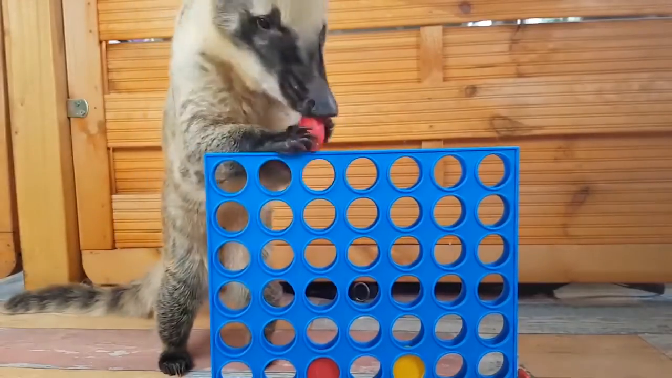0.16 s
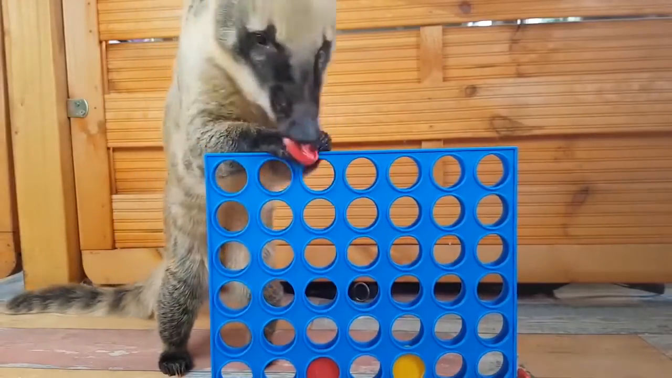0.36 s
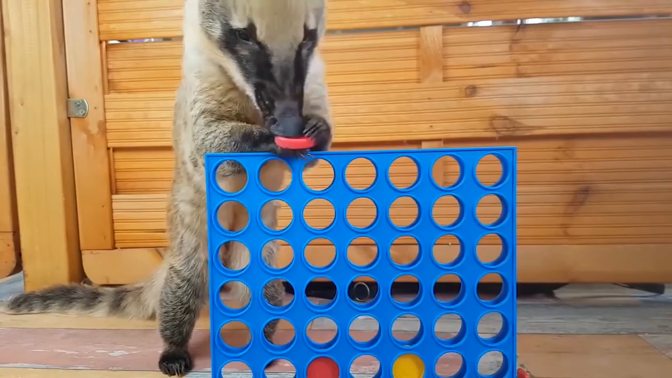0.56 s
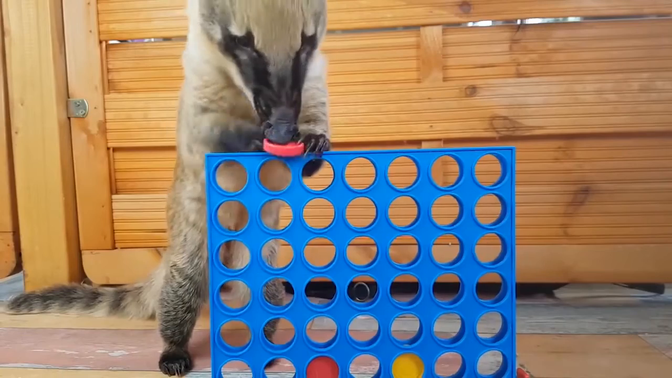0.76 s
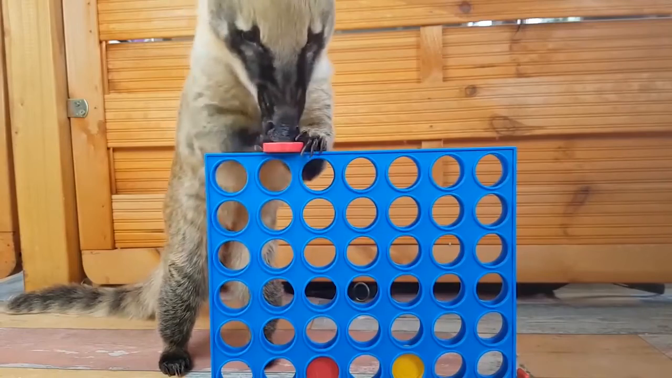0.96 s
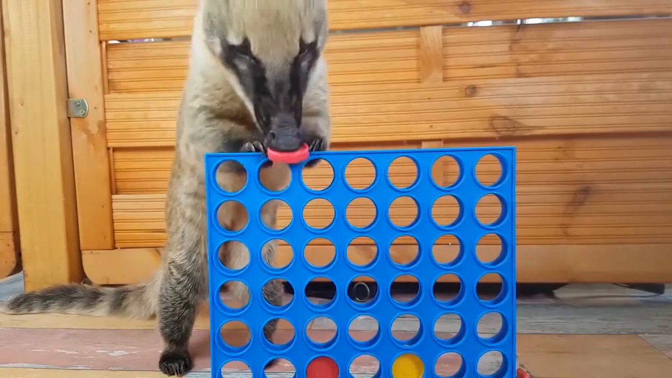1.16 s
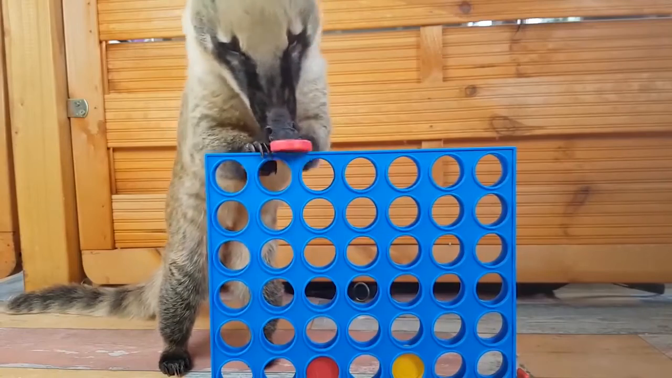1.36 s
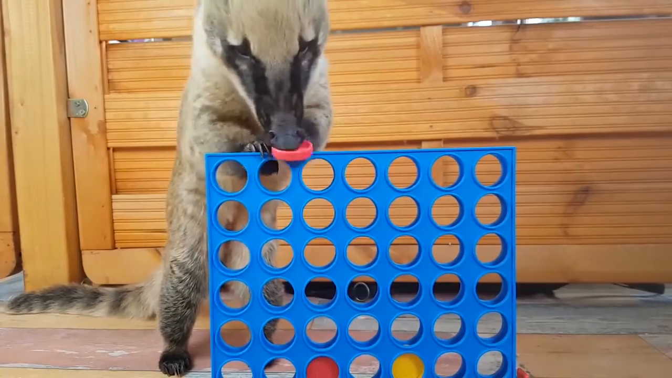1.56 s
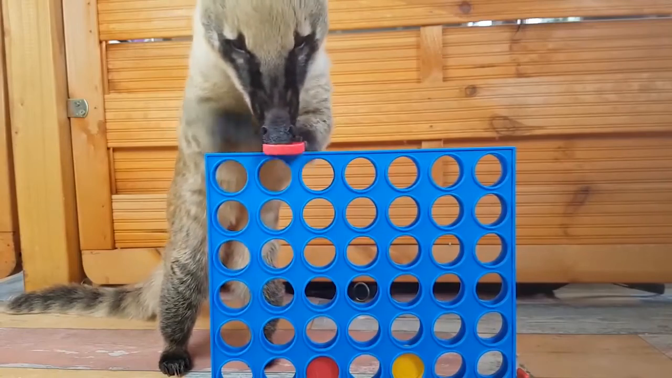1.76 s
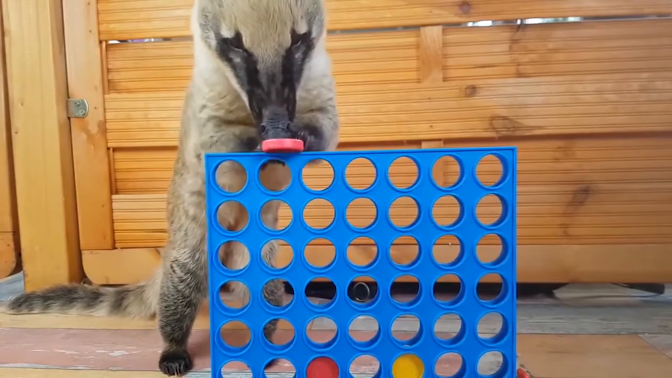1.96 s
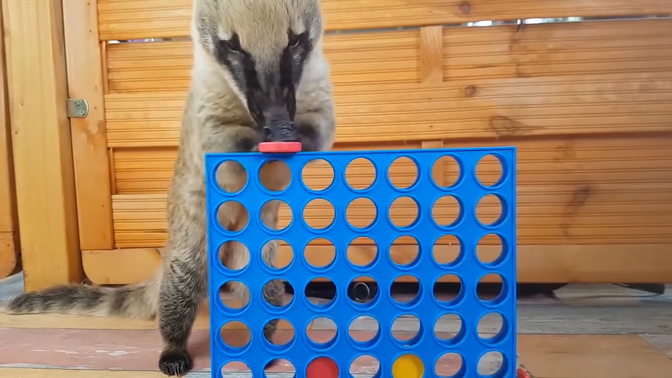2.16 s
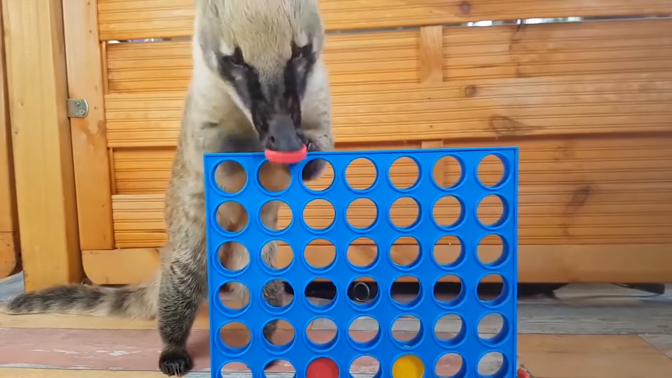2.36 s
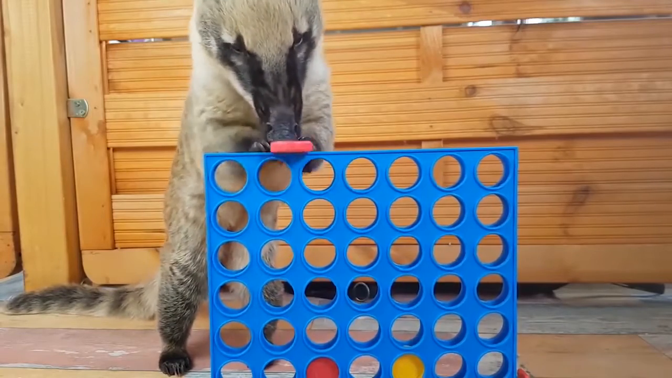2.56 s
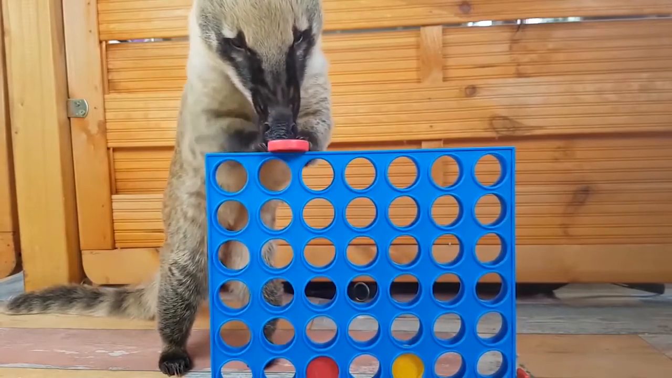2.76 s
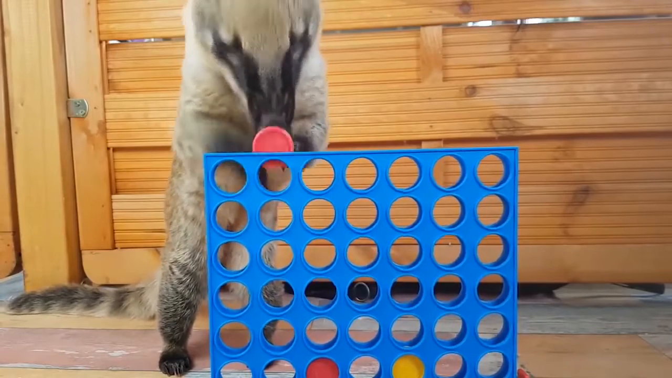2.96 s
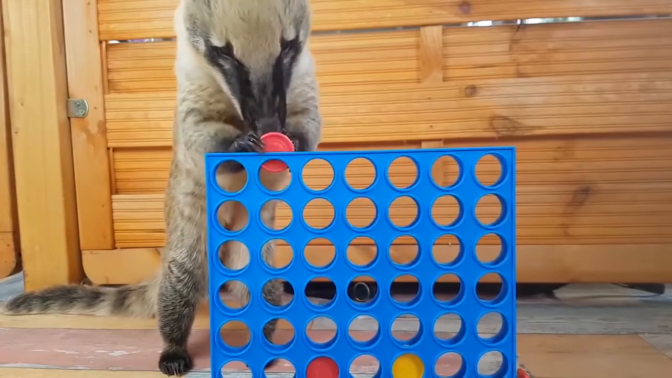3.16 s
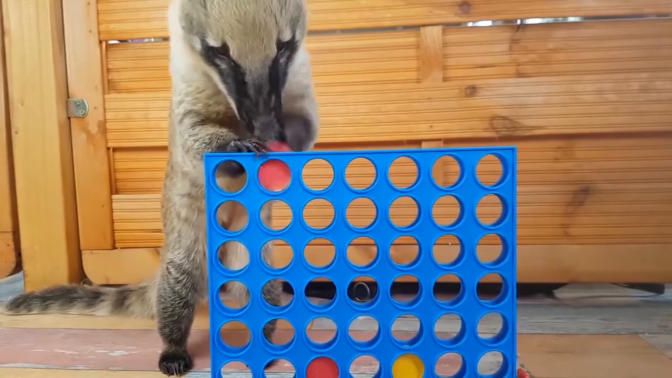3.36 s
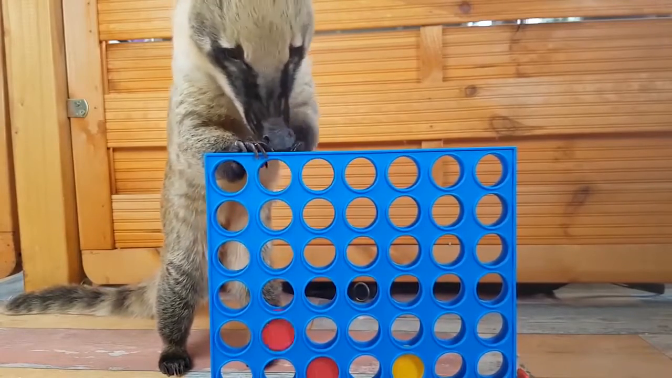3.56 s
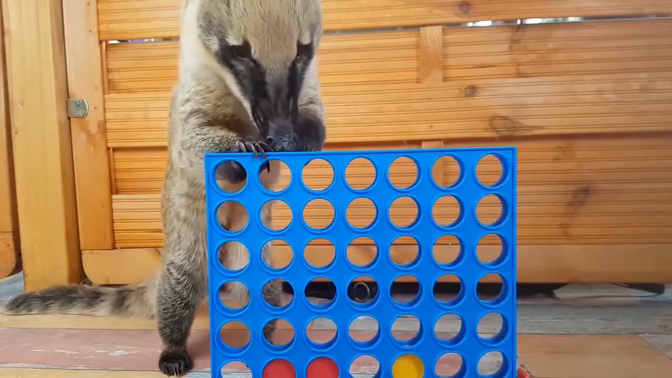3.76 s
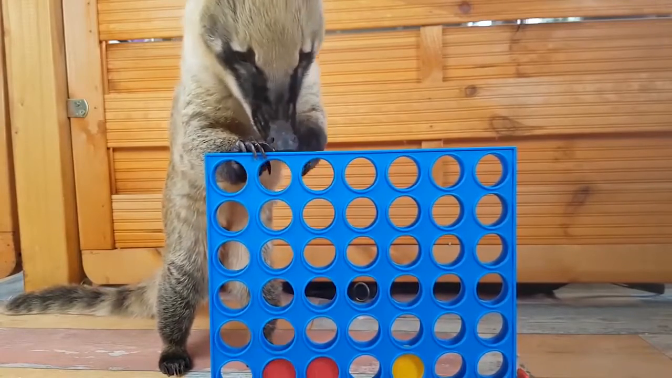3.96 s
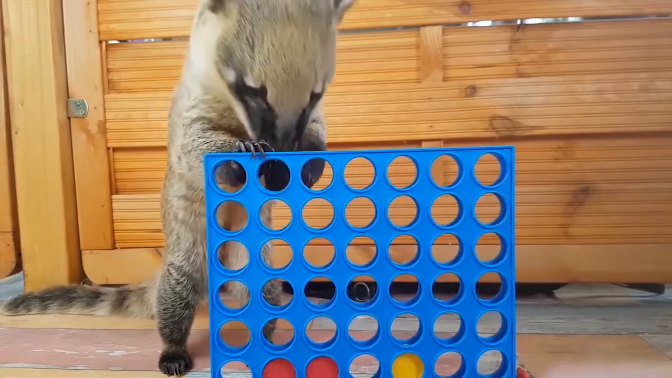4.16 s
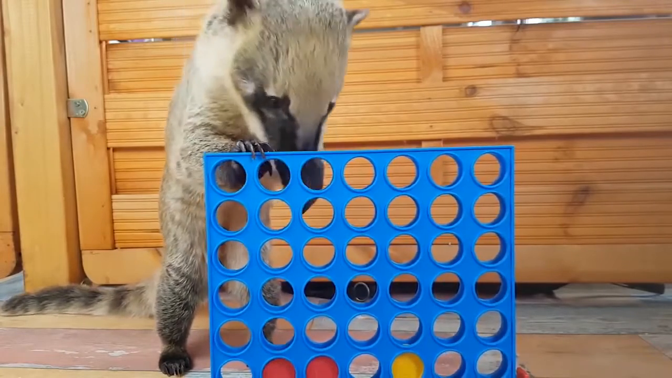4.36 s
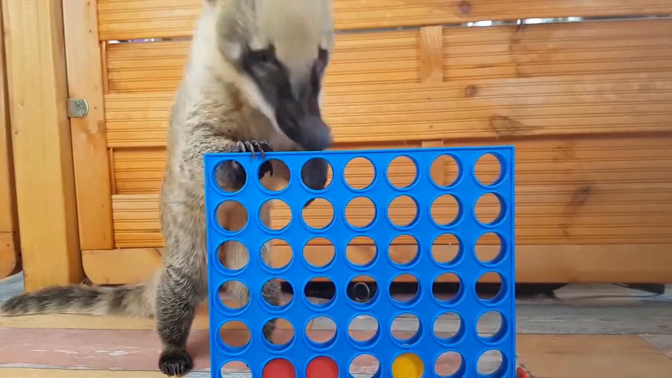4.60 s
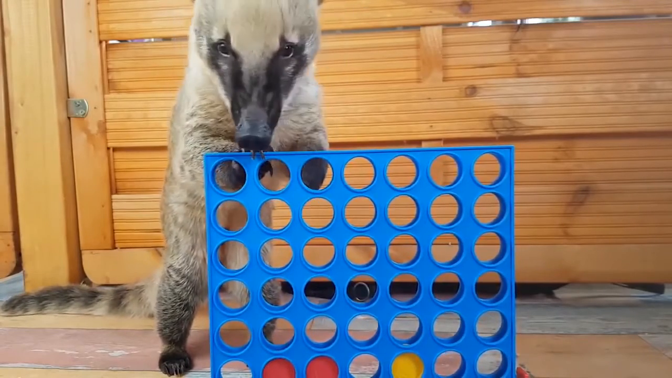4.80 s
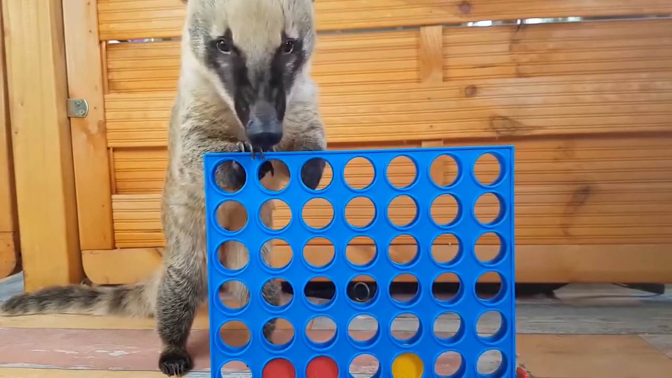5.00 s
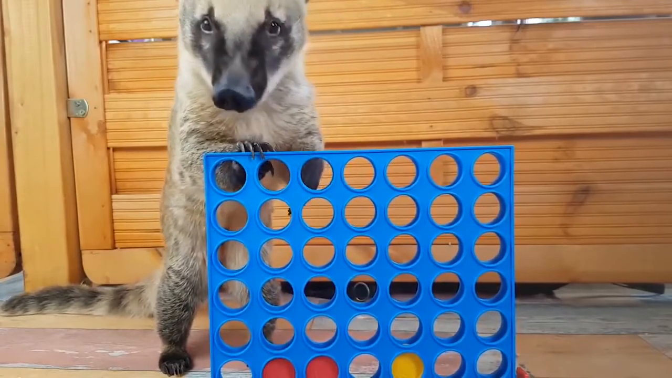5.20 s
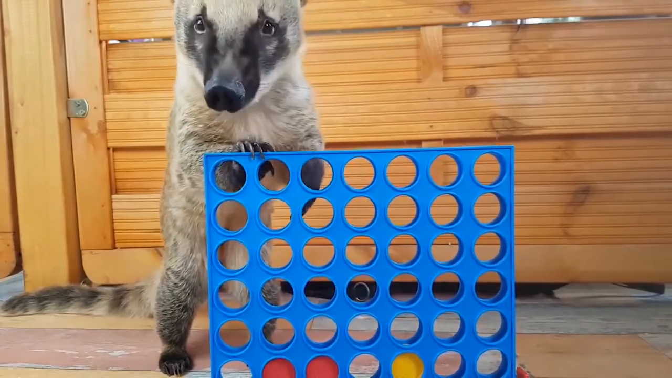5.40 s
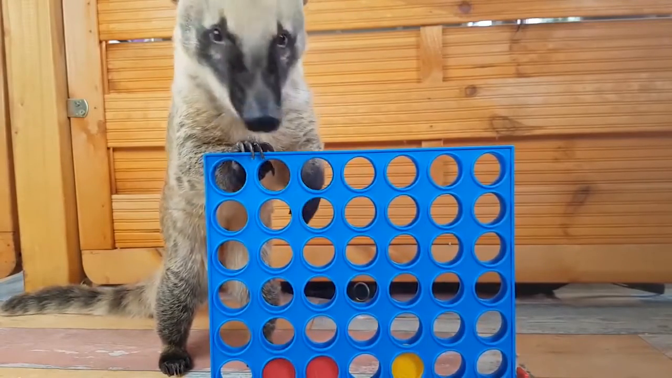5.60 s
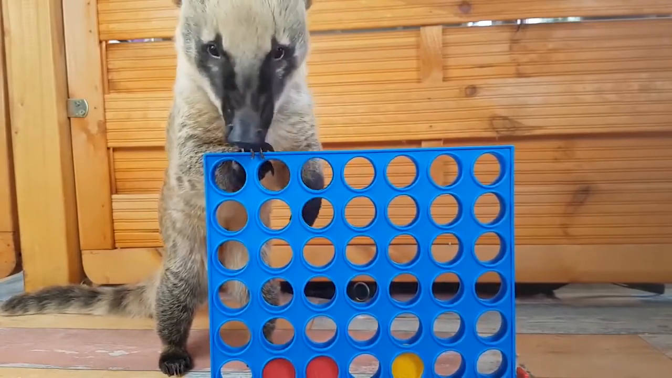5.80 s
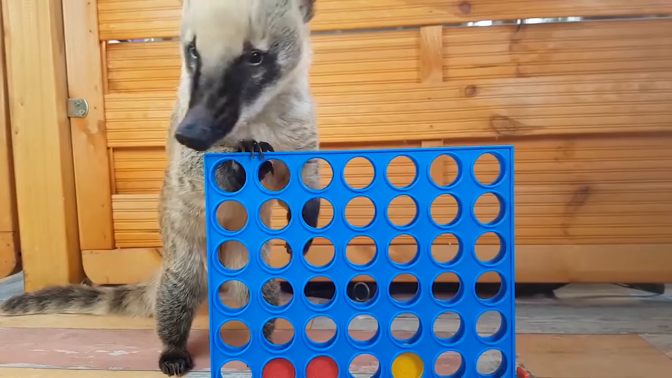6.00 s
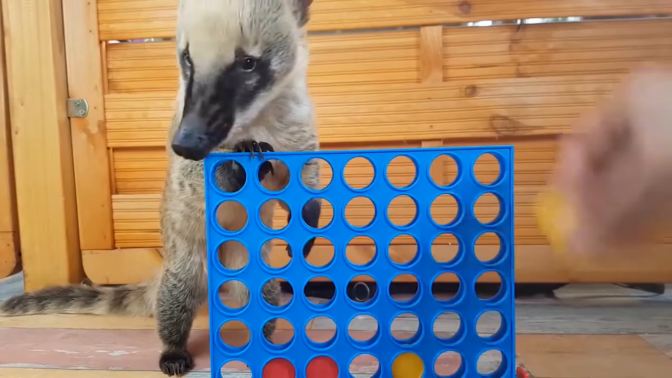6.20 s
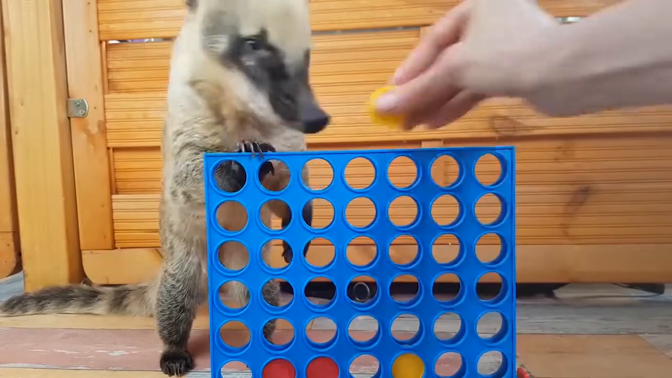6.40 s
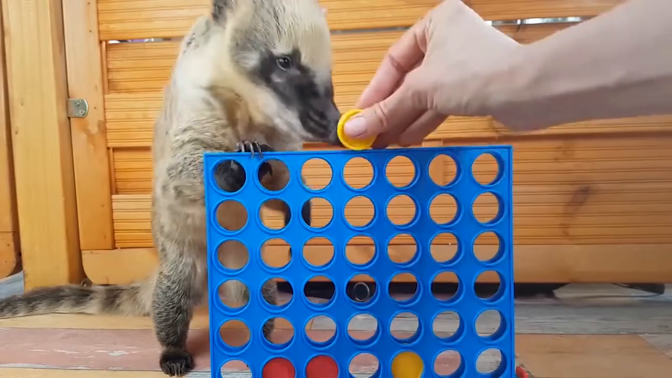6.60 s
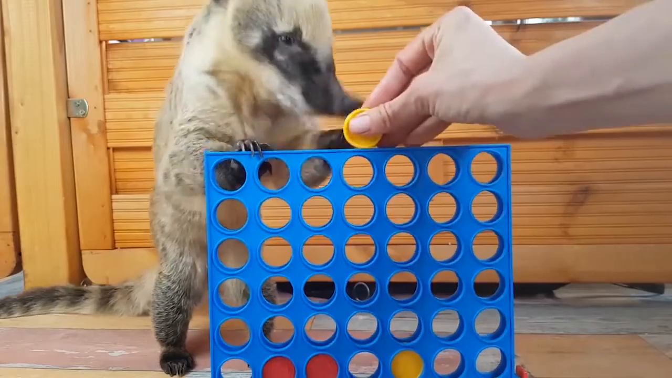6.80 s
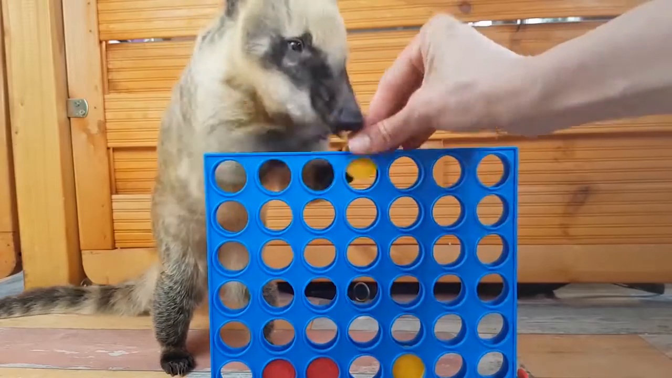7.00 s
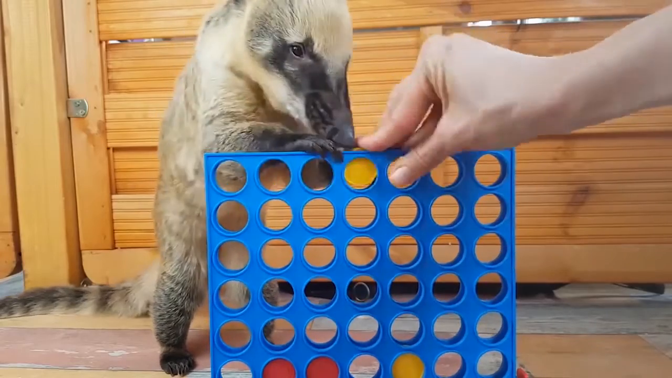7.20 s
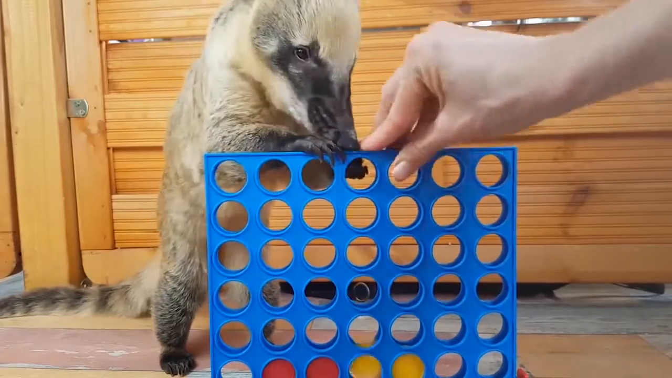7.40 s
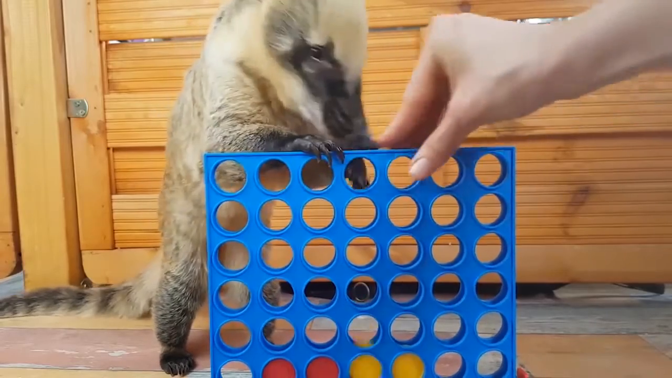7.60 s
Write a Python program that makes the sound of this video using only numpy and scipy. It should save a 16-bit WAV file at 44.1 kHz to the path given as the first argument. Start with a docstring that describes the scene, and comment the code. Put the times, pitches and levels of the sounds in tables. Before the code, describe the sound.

A hard plastic disc clacks, skids and scrapes on a hollow upright plastic grid, pauses for microphone handling clicks, then a second disc knocks and drops.

```python
"""A plastic disc, mouthed by an animal, clacks and skids on an upright plastic grid; a second is knocked on its rim.
Blows are force bursts through filters for a hollow body and a bright crack; skids are stick-slip noise.
Fingers click, tick and rub on the microphone housing, through case resonances and coloured noise.
Shoves thud in the frame and wooden boards knock dully, over a low rumble and faint air.
The disc sounds get short plastic echoes, a ring of grid modes and a small room."""
import sys
import numpy as np
from scipy import signal
from scipy.fft import rfft, irfft
from scipy.io import wavfile

SR = 44100
rng = np.random.default_rng(int(sys.argv[2]) if len(sys.argv) > 2 else 0)


def master_out(mix):
    """Clip the mix to full scale and print it as 16-bit PCM to the path in sys.argv[1]."""
    frames = np.transpose(np.atleast_2d(mix))
    ceiling = np.clip(frames, -1, 1)
    pcm = np.round(ceiling * 32767).astype(np.int16)
    wavfile.write(sys.argv[1], SR, pcm)


N = 337365
TIME = np.arange(N) / SR
LAG = np.arange(SR // 2) / SR   # time axis of the impulse responses, s

# Event levels are relative: each layer adds its own gain.
# Low rumble. Each row: time in seconds, level in dB.
RUMBLE_LEVELS = [(0.0, -54.5), (0.89, -59.5), (1.36, -55), (2.13, -58.5), (2.53, -52.5), (2.75, -58),
                 (3.86, -56.5), (4.07, -67), (4.81, -55.5), (5.09, -67), (5.75, -68), (6.03, -61),
                 (6.31, -54.5), (6.77, -55.5), (7.31, -50), (7.65, -52.5)]
# Something set against the boards. Each row: time in seconds, level in dB.
BOARD_KNOCKS = [(4.327, -47.5), (4.755, -46), (6.177, -35.5)]
# Paws and disc shove the whole frame. Each row: time in seconds, level in dB.
FRAME_BUMPS = [(0.184, -32), (1.013, -21), (1.349, -39.5), (1.469, -34), (1.803, -36.5), (2.563, -30),
               (2.633, -28), (3.192, -35), (3.238, -22), (3.605, -32.5), (4.755, -33.5), (7.154, -28.5)]
# The housing clicks under the fingers. Each row: time in seconds, level in dB.
HOUSING_CLICKS = [(5.3059, -16.5), (5.374, -30.5), (5.446, -50)]
# Fingernails tick on the housing. Each row: time in seconds, level in dB, pitch in Hz.
NAIL_TICKS = [(4.9532, -34.5, 4400), (4.9818, -38.5, 4410), (4.997, -35, 3270), (5.0493, -39.5, 4330),
              (5.1102, -44, 3230), (5.4985, -49, 4800)]
# Fingers rub the housing. Each row: start in seconds, end in seconds, murmur in dB, hiss in dB.
FINGER_RUBS = [(4.788, 5.096, -53, -64.5), (5.189, 5.26, -56, -73), (5.3, 5.574, -51.5, -63.5)]
# Teeth and claws snap off the disc. Each row: time in seconds, body in dB, crack in dB.
SNAPS = [(0.054, -49, -58), (0.296, -68, -63), (0.491, -64, -54), (1.219, -49, -45.5), (1.389, -39, -28),
         (2.348, -45, -33.5), (2.602, -34, -24.5), (3.28, -61, -41), (3.387, -52, -44), (3.558, -55.5, -51),
         (4.367, -51, -64), (7.132, -46, -40), (7.339, -58, -38)]
# A disc's edge knocks on the hollow rim. Each row: time in seconds, body in dB, crack in dB, pitch in Hz.
RIM_KNOCKS = [(0.022, -34.5, -62, 1310), (0.368, -37.5, -52, 1680), (0.501, -43.5, -55, 1200),
              (0.536, -34, -43, 1360), (4.326, -45, -58, 1890), (6.176, -44.5, -42.5, 705),
              (6.695, -52, -65, 760), (6.786, -32.5, -36, 1280), (6.893, -49.5, -57, 1440),
              (7.099, -32, -29.5, 1430), (7.297, -38.5, -31, 1530)]
# A disc slides a longer way over the plastic. Each row: start in seconds, end in seconds, level in dB.
SLIDES = [(0.004, 0.05, -54), (0.086, 0.141, -53.5), (0.903, 0.998, -63), (1.28, 1.367, -53),
          (1.416, 1.636, -59.5), (1.797, 1.916, -61), (2.213, 2.335, -57), (2.381, 2.43, -52),
          (2.544, 2.628, -43.5), (3.182, 3.234, -35.5), (3.532, 3.96, -58), (3.806, 3.849, -43),
          (7.249, 7.405, -54.5), (7.569, 7.64, -53)]
# A disc strikes the grid. Each row: time in seconds, body in dB, crack in dB, skid length in seconds (0: none).
CLACKS = [(0.106, -58, -51, 0), (0.522, -53.5, -47, 0), (0.556, -46.5, -45.5, 0.046), (0.974, -50, -58, 0),
          (0.996, -41, -63, 0), (1.012, -37.5, -35.5, 0.059), (1.109, -31.5, -33.5, 0.037),
          (1.31, -47, -52.5, 0.019), (1.463, -53, -47, 0.023), (1.568, -56.5, -58, 0.088),
          (1.849, -64, -58, 0), (1.961, -59, -61.5, 0.013), (2.006, -42.5, -48.5, 0.051),
          (2.103, -45.5, -53.5, 0.0039), (2.128, -49, -46, 0.061), (2.179, -40, -52.5, 0.02),
          (2.329, -37.5, -40.5, 0.04), (2.466, -37.5, -36, 0.052), (2.576, -43, -60, 0),
          (2.662, -35.5, -34, 0.023), (2.798, -42.5, -40, 0.025), (2.939, -38.5, -38, 0.022),
          (2.96, -35.5, -33.5, 0.014), (3.037, -42, -50.5, 0.038), (3.164, -37.5, -41, 0.023),
          (3.186, -32, -34, 0.00057), (3.239, -28, -28, 0.0091), (3.649, -41.5, -44, 0.028),
          (3.732, -48.5, -39, 0.034), (3.795, -25, -25, 0.018), (3.955, -29.5, -29, 0.0026),
          (4.022, -39.5, -40, 0.025), (6.842, -53.5, -60, 0.075), (7.176, -38.5, -39.5, 0.044),
          (7.317, -42.5, -46, 0.0033), (7.408, -30, -33.5, 0.004), (7.593, -47, -38, 0.026),
          (7.642, -43, -37.5, 0)]

# Ringing modes of the grid. Each row: frequency in Hz, relative level in dB, t60 in seconds.
GRID_MODES = [(1284, -4, .18), (1392, 0, .2), (1638, -1, .15), (1830, -3, .14), (2030, -5, .11),
              (2246, -3, .13), (2406, -4, .1), (2590, -4, .11), (2846, -2, .12), (3125, -3, .1),
              (4110, -6, .12), (4236, -4, .14), (4878, -7, .14)]
# Resonances of boards, housing and rim. Each row: frequency in Hz, width in Hz, relative level in dB.
BOARD_RESONANCES = [(235, 36, -7), (397, 65, -3), (692, 39, -1), (950, 220, -9)]
HOUSING_RESONANCES = [(372, 63, 1.5), (1650, 287, -28.5), (3760, 100, -9), (4940, 137, 4), (6190, 200, -12),
                      (7470, 53, 6), (11100, 370, -24.5), (12370, 150, -12.5)]
RIM_RESONANCES = [(760, 170, -34), (1080, 96, -17), (1360, 170, 34), (1730, 200, 19), (1980, 230, 15),
                  (3160, 99, -25)]
# Spectra, scaled to energy 1 when used. Each row: frequency in Hz, relative level in dB.
RUMBLE_SPECTRUM = [(20, -22.5), (45, -4.5), (72, 2), (150, 1.5), (220, -3.5), (310, -7.5), (480, -34.5),
                   (1000, -49.5)]
AIR_SPECTRUM = [(200, 3.5), (500, 2), (900, 2.5), (1500, -4), (2500, -8.5), (4000, -18.5), (8000, -23.5),
                (13000, -24), (16000, -20)]
FRAME_SPECTRUM = [(35, -34.5), (75, -16), (115, -9.5), (150, 2), (200, -6.5), (255, -9.5), (360, -22.5),
                  (700, -32.5), (2000, -69.5)]
MURMUR_SPECTRUM = [(120, -26), (250, 2.5), (340, 10), (520, -8.5), (800, -8), (1500, -14), (3000, -47.5)]
HISS_SPECTRUM = [(1000, -6), (3400, 2), (4200, -2), (5100, -1.5), (6400, -7.5), (7400, -3), (9000, -15.5),
                 (12800, -11.5), (16000, -17)]
BODY_SPECTRUM = [(200, -17.5), (330, -20), (500, -14.5), (680, -9.5), (900, -9), (1400, -0.5), (1750, 2),
                 (2300, 1), (3000, -8), (4000, -15), (6500, -47)]
CRACK_SPECTRUM = [(1500, -41.5), (3000, -10), (4300, 6.5), (5800, 3.5), (7300, 7), (9500, 1.5),
                  (11200, 3.5), (13200, 4), (16000, -5)]
# Decay of the wooden corner. Each row: frequency in Hz, t60 in seconds.
ROOM_DECAYS = [(200, 0.3), (1500, 0.27), (5000, 0.27), (13000, 0.18)]

CONTACT_S = 0.012   # a contact carries the energy of this much sound at its level
CUTOFF_HZ = 16000
CLACK_PITCH_HZ, PITCH_SCATTER = 1720, 0.13   # pitch of the struck spot; relative spread between blows
SKID_DB, SKID_LEAD = -7, 0.29   # skid relative to its clack; share of the skid before the blow
BRIGHT_FROM_DB, BRIGHTENING = -43.5, 0.74   # slide level where crack equals body; extra crack dB per dB above it
RUB_EDGE_S, RUB_SAG_DB_PER_S = 0.04, -23   # onset and release time of a rub; its fade as the finger slows


def from_db(db):
    """Decibels to amplitude gain."""
    return 10 ** (np.asarray(db) / 20)


def unit(response):
    """Scale each channel to energy 1."""
    return response / np.sqrt(np.sum(response ** 2, axis=-1, keepdims=True) + 1e-20)


def dying(t60_s):
    """Exponential decay, 60 dB down after t60_s."""
    return np.exp(-np.log(1000) * LAG / t60_s)


def at_hz(points, hz):
    """Interpolate a table on a log-frequency axis."""
    table_hz, value = np.transpose(points)
    return np.interp(np.log(hz + 1e-9), np.log(table_hz), value)


def through(sound, response):
    """Convolve a sound with an impulse response, keeping its length."""
    wet = signal.fftconvolve(np.atleast_2d(sound), np.atleast_2d(response), axes=-1)
    return wet[:, :np.shape(sound)[-1]]


def highpass(sound, order, hz):
    """Butterworth high-pass."""
    return signal.sosfilt(signal.butter(order, hz, "high", fs=SR, output="sos"), sound)


def colour(points, size=4096):
    """Minimum-phase response of the given spectrum, by folding the cepstrum; energy 1."""
    magnitude = from_db(at_hz(points, np.arange(size // 2 + 1) * SR / size))
    cepstrum = irfft(np.log(magnitude))
    cepstrum[1:size // 2] *= 2
    cepstrum[size // 2 + 1:] = 0
    return unit(irfft(np.exp(rfft(cepstrum))))


def resonances(rows, spread_rad):
    """Damped sines that reach the two microphones up to spread_rad apart in phase."""
    out = 0
    for k, (hz, width_hz, db) in enumerate(rows):
        lead = (-1) ** k   # the leading side alternates
        phase = spread_rad * rng.uniform(0.23, 1) * lead * np.array([[-.5], [.5]])
        decay = np.exp(-np.pi * width_hz * LAG)
        out = out + from_db(db) * width_hz * decay * np.sin(2 * np.pi * hz * LAG + phase)
    return unit(out)


def room(count=12):
    """Dense reflections as decaying noise bands, different on each side; the treble dies first."""
    edges_hz, out = np.geomspace(100, 18000, count), 0
    for low_hz, high_hz in zip(edges_hz, edges_hz[1:]):
        bandpass = signal.butter(2, [low_hz, high_hz], "band", fs=SR, output="sos")
        band = signal.sosfilt(bandpass, rng.standard_normal((2, len(LAG))))
        out = out + band * dying(at_hz(ROOM_DECAYS, np.sqrt(low_hz * high_hz)))
    return unit(out * (1 - dying(0.0074)))   # soft onset


def shell(smear_s, bounce, count=4):
    """Waves bounce to and fro in thin plastic: all-pass echoes smear a click over milliseconds."""
    hz = np.arange(len(LAG) // 2 + 1) * SR / len(LAG)
    response = 1
    for share in rng.dirichlet(np.full(count, 3), 2).T:   # the delays on each side sum to smear_s
        delay_samples = np.round(share[:, None] * smear_s * SR)
        delay = np.exp(-2j * np.pi * hz * delay_samples / SR)
        response = response * (bounce + delay) / (1 + bounce * delay)
    return irfft(response, len(LAG))


def grid_ring():
    """The few grid modes that outlast the blow: decaying sines, random phase on each side."""
    out = 0
    for hz, db, t60_s in GRID_MODES:
        out = out + from_db(db) * dying(t60_s) * np.sin(2 * np.pi * (hz * LAG + rng.random((2, 1))))
    return unit(out)


def contacts(times_s, levels_db, chatter_t60_s, chatter_db, side_db):
    """Each contact is one push plus a decaying noise chatter, partly different on each side."""
    force = np.zeros((2, N + len(LAG)))
    for at_s, db in zip(times_s, levels_db):
        mid, side = rng.standard_normal((2, len(LAG))) * dying(chatter_t60_s)
        chatter = unit(mid + from_db(side_db) * side * [[1], [-1]])
        burst = unit((LAG == 0) + from_db(chatter_db) * chatter)
        start = max(0, round(at_s * SR))
        force[:, start:start + len(LAG)] += from_db(db) * burst
    return force[:, :N] * np.sqrt(CONTACT_S * SR)


def spots(times_s, levels_db, pitches_hz, width_hz):
    """The struck spot rings for a few milliseconds at a pitch of its own."""
    out = np.zeros((2, N + len(LAG)))
    for at_s, db, hz in zip(times_s, levels_db, pitches_hz):
        start = max(0, round(at_s * SR))
        out[:, start:start + len(LAG)] += from_db(db) * resonances([(hz, width_hz, 0)], spread_rad=1.9)
    return out[:, :N] * np.sqrt(CONTACT_S * SR)


def soft_onsets(times_s, levels_db, swell_s):
    """Noise that swells exponentially for about a millisecond and softens the onset of each blow."""
    swell = np.zeros(N)
    for at_s, db in zip(times_s, levels_db):
        before = slice(max(0, round((at_s - .05) * SR)), round(at_s * SR))
        swell[before] += from_db(db) * np.exp((TIME[before] - at_s) / swell_s)
    return swell * rng.standard_normal(N)


def blows(table, body, body_db, crack_db, chatter_t60_s, chatter_db, onset_db):
    """A push with a soft noisy onset drives a hollow body and a bright crack, each at its own level."""
    times_s, body_levels_db, crack_levels_db = np.transpose(table)[:3]
    parts = (body_levels_db + body_db, body), (crack_levels_db + crack_db, colour(CRACK_SPECTRUM))
    out = 0
    for levels_db, response in parts:
        force = contacts(times_s, levels_db, chatter_t60_s, chatter_db, side_db=-3.5)
        force = force + soft_onsets(times_s, levels_db + onset_db, swell_s=0.00083)
        out = out + through(force, response)
    return highpass(out, 1, 500)   # small thin parts radiate little bass


def friction(slips_per_s, uneven_db, smooth_db):
    """Stick and slip: tiny clicks of uneven size over a smooth hiss; rms 1."""
    sizes = from_db(uneven_db * np.minimum(rng.exponential(1, N), 4)) * rng.choice([-1, 1], N)
    slips = sizes * (rng.random(N) < slips_per_s / SR)
    return np.sqrt(N) * unit(unit(slips) + from_db(smooth_db) * unit(rng.standard_normal(N)))


def wavering(rate_hz, depth_db):
    """A gain that wanders at random, as an unsteady pressure does."""
    knots = rng.standard_normal(N // 100)
    return from_db(depth_db * np.interp(TIME * rate_hz, np.arange(len(knots)), knots))


def held(start_s, end_s, edge_s):
    """Rise, hold and release of one stroke; the ramps centre on start and end."""
    return np.clip(np.minimum(TIME - start_s, end_s - TIME) / edge_s + .5, 0, 1)


def strokes(edge_s):
    """Strength of the dragging, for body and crack: skids go with clacks, slides brighten with level."""
    drags = []
    for at_s, body_db, crack_db, length_s in CLACKS:
        if length_s > 0:
            start_s, end_s = at_s - SKID_LEAD * length_s, at_s + (1 - SKID_LEAD) * length_s
            drags.append((start_s, end_s, body_db + SKID_DB, crack_db + SKID_DB))
    for start_s, end_s, db in SLIDES:
        drags.append((start_s, end_s, db, db + BRIGHTENING * (db - BRIGHT_FROM_DB)))
    body, crack = np.zeros((2, N))
    for start_s, end_s, body_db, crack_db in drags:
        stroke = held(start_s, end_s, edge_s)
        body += from_db(body_db) * stroke
        crack += from_db(crack_db) * stroke
    return body, crack


def steady(spectrum, side_db):
    """Stereo noise of the given colour and width; rms 1 in the middle."""
    mid, side = rng.standard_normal((2, N))
    return through(mid + from_db(side_db) * side * [[1], [-1]], colour(spectrum))


def background(rumble_db, air_db, air_follows):
    """Low rumble almost alike on both sides; wider faint air shares a little of its swing."""
    times_s, levels_db = np.transpose(RUMBLE_LEVELS)
    swing = from_db(np.interp(TIME, times_s, levels_db))
    rumble = from_db(rumble_db) * swing * steady(RUMBLE_SPECTRUM, side_db=-27.5)
    air_gain = from_db(air_db) * (swing / swing.mean()) ** air_follows
    return rumble + air_gain * steady(AIR_SPECTRUM, side_db=-1.5)


def board_knocks():
    """Dull wooden knocks: chattering contacts excite low board resonances."""
    times_s, levels_db = np.transpose(BOARD_KNOCKS)
    force = contacts(times_s, levels_db - 10, chatter_t60_s=0.068, chatter_db=11, side_db=-23)
    return through(force, resonances(BOARD_RESONANCES, spread_rad=0.46))


def frame_thuds(bump_db, clack_db, drag_db):
    """Shoves, clacks and dragging make the whole frame flex: their forces through a low spectrum."""
    times_s, levels_db = np.transpose(FRAME_BUMPS)
    force = contacts(times_s, levels_db + bump_db, chatter_t60_s=0.066, chatter_db=26.5, side_db=-21.0)
    times_s, body_db, _, _ = np.transpose(CLACKS)
    force = force + contacts(times_s, body_db + clack_db, chatter_t60_s=0.045, chatter_db=3.5, side_db=-16.5)
    drag, _ = strokes(edge_s=0.018)
    force = force + from_db(drag_db) * drag * rng.standard_normal(N)
    return through(force, colour(FRAME_SPECTRUM))


def rubbing():
    """Strength of the finger rubs over time, for murmur and hiss; the hiss wavers."""
    murmur, hiss = np.zeros((2, N))
    for start_s, end_s, murmur_db, hiss_db in FINGER_RUBS:
        sag = from_db(RUB_SAG_DB_PER_S * np.maximum(TIME - start_s, 0))
        stroke = held(start_s, end_s, RUB_EDGE_S) * sag
        murmur += from_db(murmur_db) * stroke
        hiss += from_db(hiss_db) * stroke
    return murmur, hiss * wavering(rate_hz=40, depth_db=4.5)


def housing(click_db, tick_db, pitched_db, murmur_db, hiss_db, case_db):
    """Clicks, nail ticks and rubbing reach the microphones through the housing, with no room."""
    # the small stiff case passes no deep bass
    case = highpass(resonances(HOUSING_RESONANCES, spread_rad=2.2), 2, 280)
    times_s, levels_db = np.transpose(HOUSING_CLICKS)
    click_force = contacts(times_s, levels_db + click_db, chatter_t60_s=.012, chatter_db=-3, side_db=-8)
    clicks = through(click_force, case)
    times_s, levels_db, pitches_hz = np.transpose(NAIL_TICKS)
    ticks = contacts(times_s, levels_db + tick_db, chatter_t60_s=0.11, chatter_db=7, side_db=-31)
    pitched = spots(times_s, levels_db + pitched_db, pitches_hz, width_hz=270)
    murmur, hiss = rubbing()
    rub = friction(slips_per_s=410, uneven_db=3.0, smooth_db=-3.0)
    skin = through(ticks + from_db(hiss_db) * rub * hiss, colour(HISS_SPECTRUM))
    skin = through(skin, shell(smear_s=0.0013, bounce=0.62))
    # after the first click the fingers press hard enough to make the case ring
    pressing = TIME > HOUSING_CLICKS[0][0]
    pressed = from_db(case_db) * through(rub * hiss * pressing, case)
    low_rub = from_db(murmur_db) * through(rub * murmur, colour(MURMUR_SPECTRUM))
    return clicks + pitched + skin + pressed + low_rub


def squeak(at_s, spread_s, hz, width_hz, level_db):
    """A claw skids on the smooth disc: a brief stick-slip burst through one high resonance."""
    pressure = np.exp(-((TIME - at_s) / spread_s) ** 2)
    slips = friction(slips_per_s=760, uneven_db=2, smooth_db=-7)
    return from_db(level_db) * through(pressure * slips, resonances([(hz, width_hz, 0)], spread_rad=1.5))


def snaps():
    """Teeth and claws snap off the disc: short blows with body and crack."""
    return blows(SNAPS, colour(BODY_SPECTRUM), body_db=-2.5, crack_db=-3,
                 chatter_t60_s=0.0099, chatter_db=6.0, onset_db=-12.5)


def rim_knocks(spot_db):
    """Hollow blows on the rim's resonances, each with the pitch of its spot."""
    times_s, body_db, _, pitches_hz = np.transpose(RIM_KNOCKS)
    hits = blows(RIM_KNOCKS, resonances(RIM_RESONANCES, spread_rad=1.6), body_db=-5.5, crack_db=-17.5,
                 chatter_t60_s=0.049, chatter_db=10, onset_db=-30)
    return hits + spots(times_s, body_db + spot_db, pitches_hz, width_hz=204)


def disc_scrapes():
    """The dragged disc rattles on the grid during each stroke: stick-slip under unsteady push."""
    body, crack = strokes(edge_s=0.01)
    slips = friction(slips_per_s=520, uneven_db=4.5, smooth_db=-9.0) * wavering(rate_hz=110, depth_db=3)
    return through(slips * body, colour(BODY_SPECTRUM)) + through(slips * crack, colour(CRACK_SPECTRUM))


def disc_clacks(spot_db):
    """Blows on the grid, each on a spot of slightly different pitch."""
    times_s, body_db, _, _ = np.transpose(CLACKS)
    pitches_hz = CLACK_PITCH_HZ * np.exp(PITCH_SCATTER * rng.standard_normal(len(times_s)))
    hits = blows(CLACKS, colour(BODY_SPECTRUM), body_db=-2.0, crack_db=-0.5,
                 chatter_t60_s=0.016, chatter_db=3.5, onset_db=-4.5)
    return hits + spots(times_s, body_db + spot_db, pitches_hz, width_hz=190)


def scene():
    """Disc sounds ring in the grid and the corner; all else is added dry."""
    lows = frame_thuds(bump_db=-8.5, clack_db=-11, drag_db=-8.0)
    lows = lows + background(rumble_db=1.5, air_db=-65.5, air_follows=0.25)
    fingers = housing(click_db=-10.0, tick_db=-15.0, pitched_db=-19.5, murmur_db=-0.5, hiss_db=3.5, case_db=-8.5)
    snapping = snaps()
    knocks = rim_knocks(spot_db=-5.5)
    drags = disc_scrapes() + squeak(at_s=.567, spread_s=0.0071, hz=13400, width_hz=480, level_db=-38.5)
    on_grid = disc_clacks(spot_db=-11) + drags
    near = through(on_grid, shell(smear_s=.004, bounce=0.78))
    near = near + through(knocks + snapping, shell(smear_s=.003, bounce=0.61))
    ringing = through(on_grid + from_db(-20) * knocks, grid_ring())
    echoes = through(on_grid + from_db(-0.5) * knocks + from_db(-3.0) * snapping, room())
    discs = from_db(-1.5) * near + from_db(-19) * ringing + from_db(-8.5) * echoes
    # left and right balance in dB
    return discs * from_db([[.8], [-.8]]) + board_knocks() + lows * from_db([[-.5], [.5]]) + fingers


def record(dry):
    """A steep elliptic low-pass cuts the top."""
    return signal.sosfilt(signal.ellip(10, .2, 70, CUTOFF_HZ, fs=SR, output="sos"), dry)


dry = scene()
out = record(dry)
master_out(out)
```